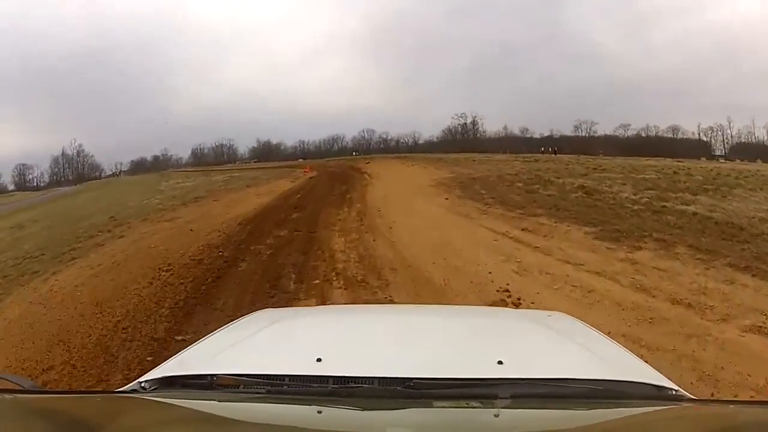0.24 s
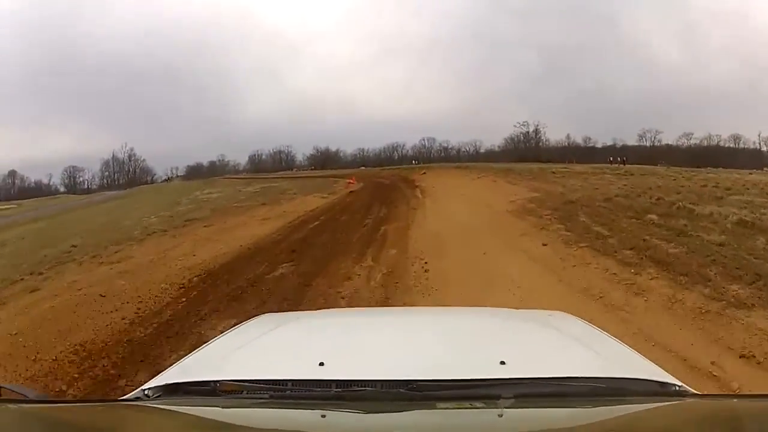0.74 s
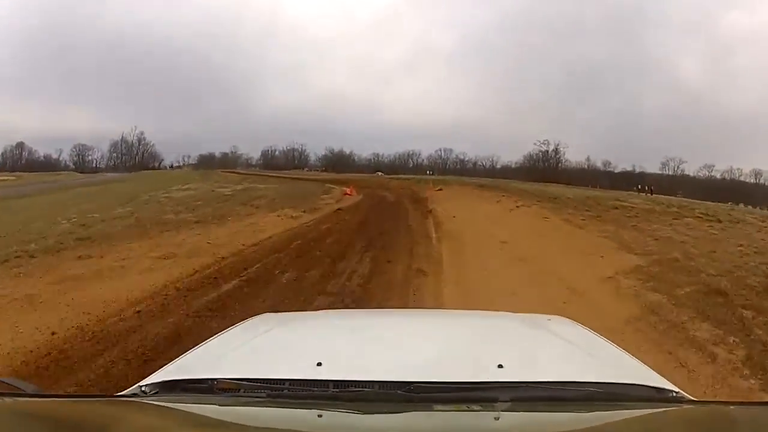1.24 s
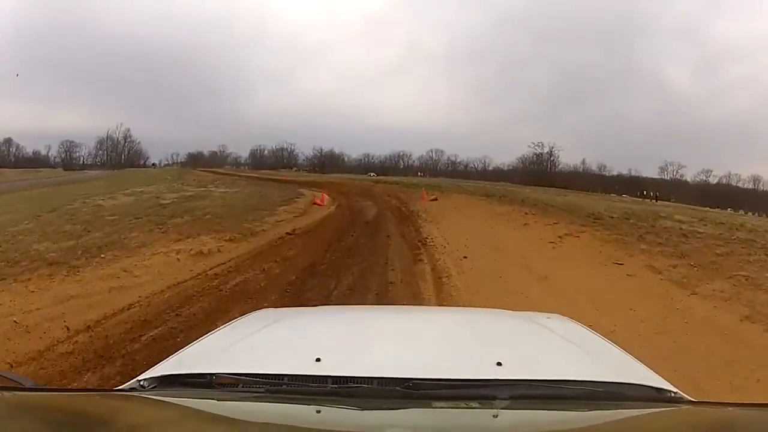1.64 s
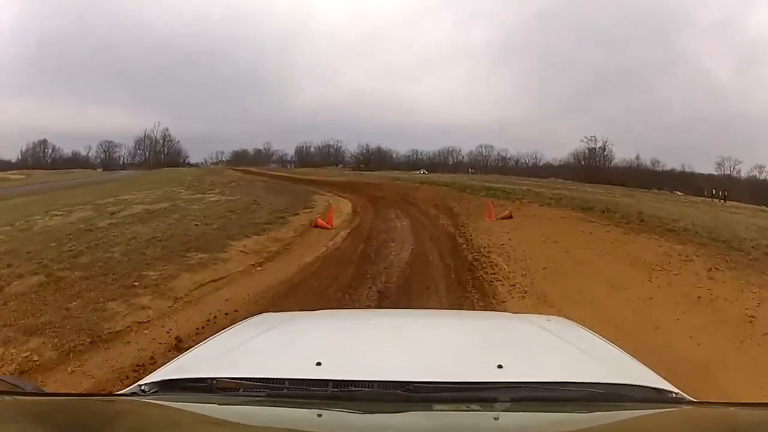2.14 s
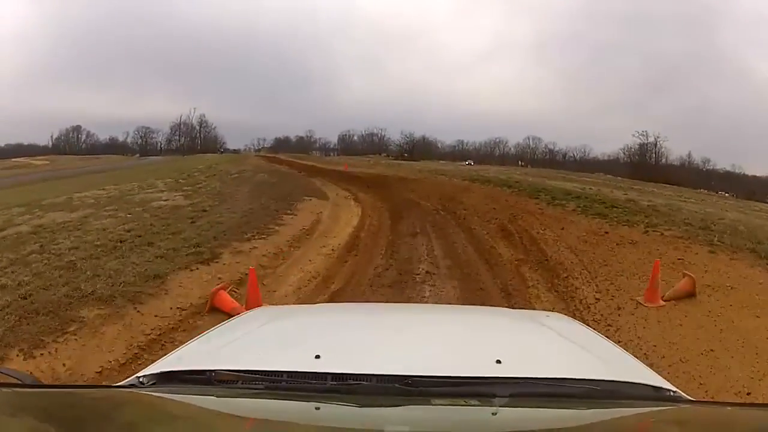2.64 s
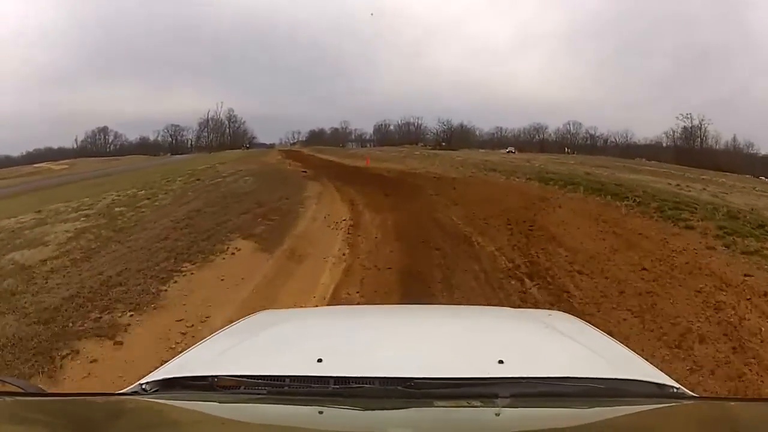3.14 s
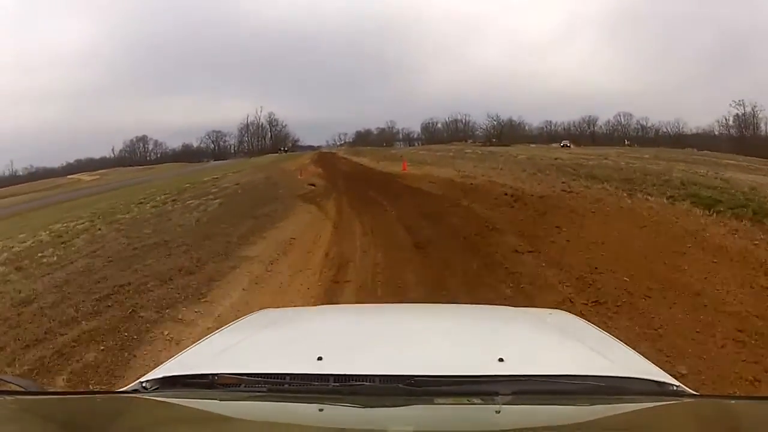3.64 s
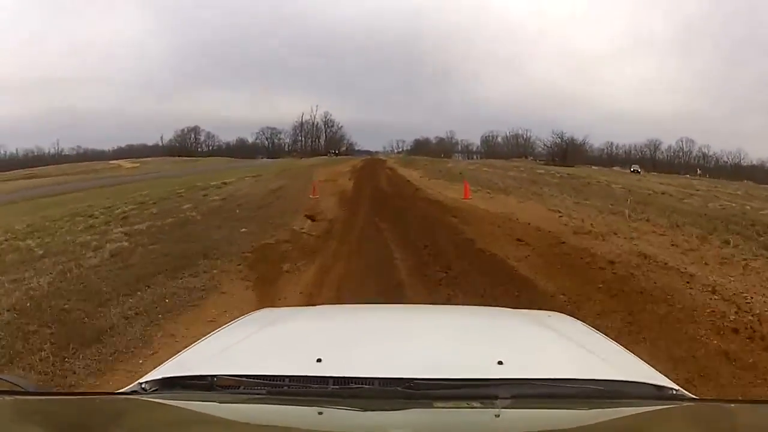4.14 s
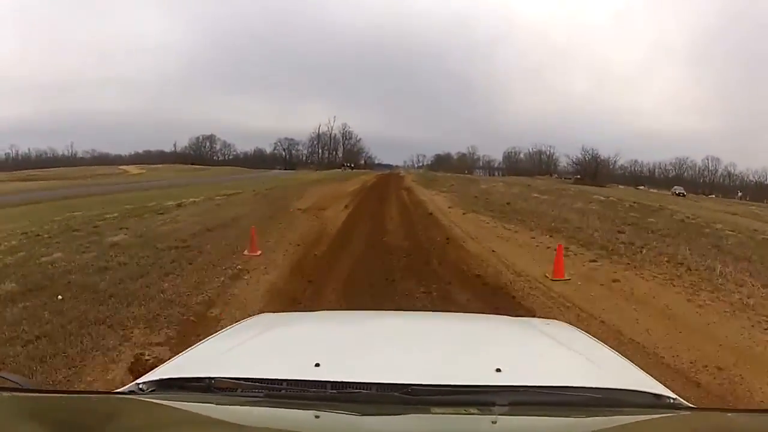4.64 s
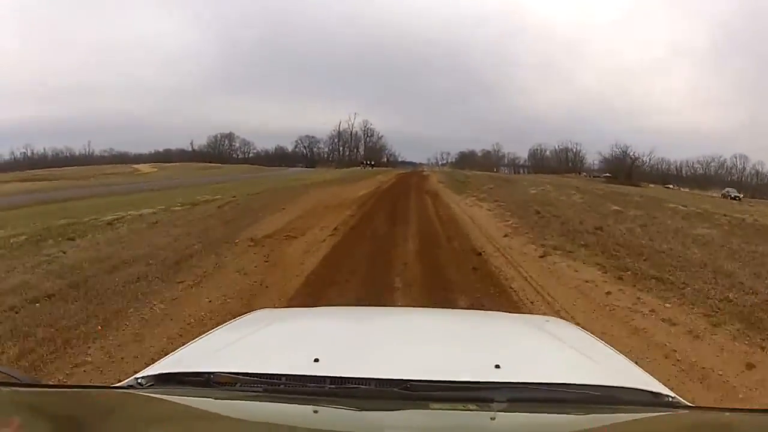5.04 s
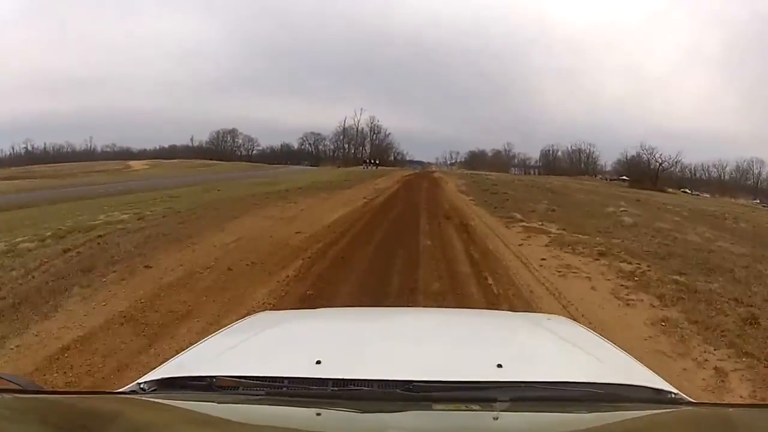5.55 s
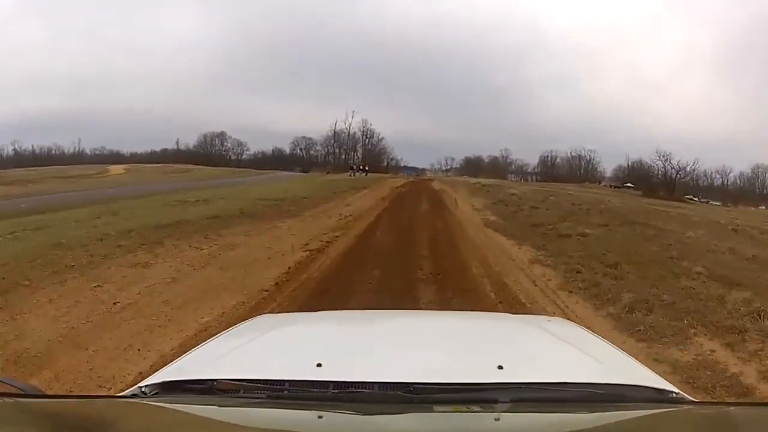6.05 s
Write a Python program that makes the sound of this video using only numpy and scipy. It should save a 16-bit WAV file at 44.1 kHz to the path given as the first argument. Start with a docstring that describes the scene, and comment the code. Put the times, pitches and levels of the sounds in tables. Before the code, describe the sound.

A microphone behind the windscreen catches muffled, bass-heavy cabin boom as a car runs a loose dirt bend. The engine sinks, swells loudly, drops out briefly, swells again, then rises in pitch down the straight. Pebbles tick and stones rattle on the floor pan in two main bursts, small squeaks slip between, bumps thump, and a dry rushing spray of grit thickens until the end.

```python
"""Rally car on dirt, heard in the cabin

A four-cylinder rally car is driven hard round a dirt bend and onto a straight; one microphone stands inside,
behind the windscreen. Exhaust orders and rut-shaken noise make the cabin boom, and each bump swells it.
Under the floor, random grains hiss in the wheel arches, loudest at the end; pebbles and stones ring the floor pan.
Filtered noise makes the shake, the drumming and the tyre roar; bent tones squeak, and an overload knocks once."""
import sys
import numpy as np
from scipy import signal
from scipy.fft import rfft, irfft
from scipy.io import wavfile
from scipy.ndimage import uniform_filter1d

SR = 44100
rng = np.random.default_rng(int(sys.argv[2]) if len(sys.argv) > 2 else 0)


def transcribe(signal):
    """Save signal, clipped to [-1, 1], as a 16-bit WAV file at the path in sys.argv[1]."""
    frames = np.atleast_2d(signal).T
    limited = np.clip(frames, -1, 1)
    pcm = np.round(limited * 32767).astype(np.int16)
    wavfile.write(sys.argv[1], SR, pcm)


N = 277830

# Resonances of the floor pan: (frequency [Hz], width [Hz], relative level [dB])
FLOOR_PAN_MODES = [(1794, 104, 8), (2215, 125, 5.5), (3250, 315, -1.5), (3576, 134, 5.5), (5127, 250, -4.5),
                   (6850, 240, -5.5), (8350, 300, -2.5), (10080, 610, -5)]
# Stones at set times, heavy and light: (time [s], dull ring level [dB],
# brightness = middle ring over dull ring [dB])
TIMED_STONES = [(.07, -36, -31), (0.294, -41, -23), (.456, -39, 6.5), (0.516, -45.5, -3), (.555, -41.5, -1),
                (.582, -40.5, 3.5), (.618, -46, 1), (.6452, -30, 0.5), (.649, -35, 2.5), (.686, -48, 1),
                (.704, -46.5, -1), (.7708, -34.5, -7), (.844, -38, -15), (3.7803, -32.5, -13),
                (3.847, -36, -8), (3.912, -37, -0.5), (3.9267, -38, -2), (3.9957, -36, -7),
                (4.0275, -28, 0.5), (4.115, -34, -25), (4.1662, -28, -2.5), (4.1833, -33, -19),
                (4.2504, -32, -8), (4.3194, -34.5, -8), (4.4094, -30.5, -9), (4.4599, -31, -19),
                (4.5101, -38.5, -3), (4.5985, -32.5, -22)]
# Stony stretches of track: (start [s], end [s], extra pebble level [dB], small stones [per s],
# their dull ring level [dB], their brightness [dB])
STONY_STRETCHES = [(0.476, 0.737, 10, 16, -50, -4), (2.0, 2.397, 4, 45, -41, -23),
                   (3.9, 4.652, 4.5, 16, -45, -1)]


def from_db(db):
    """Decibels to gain."""
    return 10 ** (np.asarray(db) / 20)


def rms_one(x):
    """Scale to unit power."""
    return x / np.sqrt(np.mean(x ** 2) + 1e-20)


def in_time(rows):
    """Each column of a curve table at every sample."""
    s, *columns = np.transpose(rows)
    return [np.interp(np.arange(N) / SR, s, column) for column in columns]


def colour(x, points):
    """Shape a steady sound with a spectrum, drawn straight over log frequency, at unit power."""
    hz, db = np.transpose(points)
    grid = np.maximum(np.fft.rfftfreq(N, 1 / SR), 1)
    gain = from_db(np.interp(np.log(grid), np.log(hz), db))
    return rms_one(irfft(rfft(x) * gain, N))


def noise():
    """White noise."""
    return rng.standard_normal(N)


def drift(rate):
    """Slow chance with about this many turns a second; spread 1."""
    lowpass = 1 / (1 + (np.fft.rfftfreq(N, 1 / SR) / rate) ** 2)
    return rms_one(irfft(rfft(noise()) * lowpass, N))


def even(x, seconds):
    """Keep the quick flutter of a sound but hold its slower level at 1."""
    size = max(int(seconds * SR), 2)
    power = uniform_filter1d(uniform_filter1d(x * x, size), size)
    return x / np.sqrt(power + 1e-12)


def resonate(x, hz, width_hz):
    """A two-pole resonance with gain 1 on top."""
    r = np.exp(-np.pi * width_hz / SR)
    b = np.array([1, 0, -1]) * (1 - r * r) / 2
    a = [1, -2 * r * np.cos(2 * np.pi * hz / SR), r * r]
    return signal.lfilter(b, a, x + 1e-18)


def engine(firing_hz, wobble=0.0031):
    """Exhaust orders, each a little unsteady; they swell and fade as they sweep across the cabin's resonances."""
    # Exhaust orders: (multiple of the firing rate, relative level [dB])
    exhaust_orders = [(0.501, -33), (0.748, -9.5), (1, 2.5), (1.25, -13), (1.5, -9), (2.001, -16),
                      (2.502, -35), (3, -26.5)]
    # How the cabin passes the exhaust: (frequency [Hz], gain [dB])
    cabin_gain = [(45, -8), (62, -2), (75, -6), (100, 0), (142, 0), (160, -18), (180, -15), (192, 2),
                  (203, 3), (216, -12), (240, -18), (305, -22), (352, -12), (430, -15)]
    turns = np.cumsum(firing_hz * (1 + wobble * drift(17.4))) / SR
    cabin_hz, cabin_db = np.transpose(cabin_gain)
    out = 0
    for multiple, db in exhaust_orders:
        gain = from_db(db + np.interp(multiple * firing_hz, cabin_hz, cabin_db))
        unsteady = 1 + .11 * drift(12)
        start = rng.random()
        out = out + gain * unsteady * np.sin(2 * np.pi * (multiple * turns + start))
    return rms_one(out)


def cabin_rumble():
    """Ruts shake the cabin's lowest resonances: noise through cascaded pairs of resonances, held level."""
    # Cabin air and panel resonances: (frequency [Hz], half the width of each resonance in a pair [Hz],
    # relative level [dB])
    cabin_modes = [(86.9, 3.9, 2.5), (106.06, 11.9, 12.5), (124, 17.4, -1)]
    out = 0
    for hz, width, db in cabin_modes:
        once = resonate(noise(), hz, 2 * width)
        out = out + from_db(db) * rms_one(resonate(once, hz, 2 * width))
    return even(out, seconds=0.074)


def bump_swells(rise_s=0.011, fall_s=0.015):
    """At each bump the cabin air takes a moment to build up, and a little longer to die away: gain."""
    # Bumps that make the cabin boom: (time of the crest [s], level [dB])
    bumps = [(.35, -11.5), (.75, -13), (1.09, -11), (1.42, -14.5), (1.72, -8.5), (1.86, -11.5), (2.48, -16),
             (2.61, -9), (2.88, -10), (3.26, -11), (3.38, -12.5), (3.56, -11), (3.64, -15), (3.8, -12),
             (3.9, -11), (4.0, -11.5), (4.09, -13), (4.17, -11.5), (4.44, -16), (4.51, -6.5), (4.569, -6.5),
             (4.63, -7.5), (4.721, -10), (4.81, -9.5), (5.03, -7.5), (5.5, -7.5), (5.77, -7.5)]
    t = np.arange(N) / SR
    power = 0
    for s, db in bumps:
        spread_s = np.where(t < s, rise_s, fall_s)
        swell = from_db(db) * np.exp(-((t - s) / spread_s) ** 2 / 2)
        power = power + swell ** 2
    return np.sqrt(power)


def boom(firing_hz, drone_db, shake_db, flutter_db=2.0):
    """Exhaust and ruts drive the same cabin air: rougher ground raises the rumble, and each bump swells it."""
    # rumble level on average ground, and the share of the shake's swing that it follows
    rumble_db, rumble_follows = -19.0, 0.79
    rutted_db = shake_db - np.mean(shake_db)
    steady_rumble = from_db(rumble_db + rumble_follows * rutted_db + flutter_db * drift(25))
    rumble = np.hypot(steady_rumble, bump_swells())
    drone = from_db(drone_db)
    level = np.hypot(drone, rumble)
    deep = signal.sosfilt(signal.butter(2, 200, fs=SR, output="sos"), cabin_rumble())
    mix = drone * engine(firing_hz) + rumble * deep
    return level * even(mix / level, seconds=0.08)


def grit(spray_db, grains_per_s=5000, spread_db=2.5, smooth=0.48, flutter_db=1.11, ring_db=-15, brighten=0.4):
    """Grains pelt the wheel arches; a harder spray is thicker and rings the upper modes of the floor pan more."""
    # Spectrum of the spray: (frequency [Hz], relative density [dB per Hz])
    spray_spectrum = [(600, -33), (1000, -12.5), (1200, 7), (1500, 3.5), (1800, 6.5), (2050, 1.5),
                      (2350, 3.5), (2800, -6.5), (3100, -3), (3300, -8.5), (3580, 1.5), (4000, -17),
                      (5000, -23), (16000, -71)]
    force_db = spray_db - np.mean(spray_db)
    born = rng.random(N) < grains_per_s * from_db(force_db) / SR
    sizes = from_db(spread_db * np.minimum(rng.exponential(1, N), 5))
    grains = born * sizes * rng.choice([-1, 1], N)
    pelting = even(grains, seconds=0.69) + smooth * noise()
    ringing = 0
    for k, (hz, width, db) in enumerate(FLOOR_PAN_MODES):
        if hz > SR / 10:
            ringing = ringing + (-1) ** k * from_db(db) * resonate(pelting, hz, width)
    hiss = colour(pelting, spray_spectrum)
    hiss = hiss + from_db(ring_db + brighten * force_db) * rms_one(ringing)
    return from_db(spray_db + flutter_db * drift(20)) * hiss


def stone_hits(count=24, spread_db=3.2):
    """The timed stones, and small ones thrown up at random on the stony stretches: rows of (s, dB, brightness dB)."""
    hits = list(TIMED_STONES)
    for start, end, _, per_s, db, bright_db in STONY_STRETCHES:
        times = start + rng.random(count) * (end - start)
        # small stones differ in weight and brightness
        spreads = spread_db * rng.standard_normal((count, 2))
        small = [(s, db + heavier, bright_db + brighter) for s, (heavier, brighter) in zip(times, spreads)]
        hits += small[:max(round(per_s * (end - start)), 0)]
    return hits


def stones(contact_s=0.0025, scuff_db=-13, crack_noise_db=-12, scatter=0.037):
    """A stone taps the floor pan and scuffs along it; chance detunes the modes, weight and brightness set levels."""
    # sharp crack against the dull ring; share of the brightness that it follows;
    # dB of crack lost for each dB that a stone is lighter than the heaviest timed one
    crack_db, crack_follows, crack_grows = -7, 0.59, 0.13
    heaviest_db = max(db for _, db, _ in TIMED_STONES)
    age = np.arange(SR // 25) / SR
    bright = signal.butter(2, [4000, 8500], "band", fs=SR, output="sos")
    out = np.zeros(N)
    for s, dull_db, bright_db in stone_hits():
        sharp_db = dull_db + crack_db + crack_follows * bright_db - crack_grows * (heaviest_db - dull_db)
        ring_db = [dull_db, dull_db + bright_db, sharp_db]
        scuff = rng.standard_normal(len(age)) * np.exp(-age / contact_s)
        detune = 1 + scatter * (2 * rng.random(len(FLOOR_PAN_MODES)) - 1)
        # light stones only tap, heavy ones drag
        force = (age == 0) + from_db(scuff_db + max(ring_db) - heaviest_db) * scuff
        # three rows: dull ring, middle ring, sharp crack; split at 2700 and 4400 Hz
        rings = np.zeros((3, len(age)))
        rings[-1] = from_db(crack_noise_db) * signal.sosfilt(bright, force)
        for k, ((hz, width, db), shift) in enumerate(zip(FLOOR_PAN_MODES, detune)):
            row = np.searchsorted([2700, 4400], hz)
            rings[row] += (-1) ** k * from_db(db) * resonate(force, hz * shift, width)
        # levels hold for the first hundredth of a second
        rings /= np.sqrt(np.mean(rings[:, :SR // 100] ** 2, axis=1, keepdims=True))
        at = int(s * SR)
        out[at:at + len(age)] += from_db(ring_db) @ rings
    return out


def pebbles(spray_db, per_s=130, size_db=28.5, spread_db=3):
    """Between the grit and the stones, small pebbles tick on single modes of the floor pan."""
    t = np.arange(N) / SR
    stony_db = sum(db * ((t > start) & (t < end)) for start, end, db, *_ in STONY_STRETCHES)
    out = np.zeros(N)
    lowest_hz = FLOOR_PAN_MODES[0][0]
    for hz, width, db in FLOOR_PAN_MODES:
        born = rng.random(N) < per_s / len(FLOOR_PAN_MODES) / SR
        taps = born * from_db(spread_db * np.minimum(rng.exponential(1, N), 3))
        # dirt cushions the contact, so the high modes get less
        cushion = (lowest_hz / hz) ** 0.95
        out += from_db(db) * cushion * resonate(taps, hz, width)
    return from_db(spray_db + size_db + stony_db) * out


def overload_knock():
    """The loudest boom overloads the recorder: one short, soft low-mid knock."""
    # Knock: (time [s], strength before softening [dB])
    knock_rows = [(4.504, -14)]
    # Overload knock: (frequency [Hz], width [Hz], relative level [dB])
    knock_bands = [(290, 130, 0), (460, 150, -6)]
    knocks = np.zeros(N)
    for s, db in knock_rows:
        knocks[int(s * SR)] = from_db(db)
    soft = signal.sosfilt(signal.butter(4, 620, fs=SR, output="sos"), knocks + 1e-18)
    out = 0
    for hz, width, db in knock_bands:
        # scaled so that a unit knock, unsoftened, starts a 0 dB band at about height 1
        scale = SR / (2 * np.pi * width)
        out = out + from_db(db) * scale * resonate(soft, hz, width)
    return out


def squeaks(rough=0.022):
    """Rubber sticks and slips: a short, nearly pure tone that bends in pitch."""
    # Squeaks: (time [s], length [s], start pitch [Hz], middle pitch [Hz], end pitch [Hz], level at the middle [dB])
    squeak_rows = [(0.036, 0.062, 501, 491, 460, -42.5), (0.448, 0.067, 635, 594, 543, -44.5),
                   (2.036, 0.27, 475, 549, 496, -42), (2.639, 0.088, 774, 723, 720, -39),
                   (2.712, 0.047, 672, 620, 589.4, -34.5)]
    out = np.zeros(N)
    waver = 1 + rough * drift(77)
    for s, length, *pitch_hz, db in squeak_rows:
        along = np.clip((np.arange(N) / SR - s) / length, 0, 1)
        bend = np.polyfit([0, .5, 1], pitch_hz, 2)
        hz = np.polyval(bend, along) * waver
        tone = np.sin(2 * np.pi * np.cumsum(hz) / SR)
        out += from_db(db) * np.sqrt(2) * np.sin(np.pi * along) * tone
    return out


def chassis_shake(shake_db):
    """Rutted ground shakes the chassis: deep noise, held even and then set to the ground's level."""
    # Spectrum of the shake: (frequency [Hz], relative density [dB per Hz])
    shake_spectrum = [(12, -20), (22, -9), (30, -4), (40, -13), (52, -6), (62, 1), (74, -3), (95, -25),
                      (200, -60)]
    return from_db(shake_db) * even(colour(noise(), shake_spectrum), seconds=0.1)


def upper_drumming():
    """The cabin drums above its boom: narrow low noise, held even and then set to a moving level."""
    # Spectrum of the drumming: (frequency [Hz], relative density [dB per Hz])
    drumming_spectrum = [(110, -5), (150, -23.5), (172, -1), (195, 2), (215, -11), (240, -19), (300, -73),
                         (600, -101)]
    # Drumming: (time [s], level [dB])
    level_curve = [(0, -29), (1.3, -31.5), (1.65, -28), (2.05, -37), (2.5, -23), (2.9, -31.5), (3.5, -29),
                   (4.1, -24.5), (4.7, -32), (5.6, -27), (6.3, -29.5)]
    drumming_db, = in_time(level_curve)
    return from_db(drumming_db) * even(colour(noise(), drumming_spectrum), seconds=0.21)


def tyre_roar(trim_db=1.5):
    """Tyres roar on the dirt: mid-band noise that follows a moving level."""
    # Spectrum of the roar: (frequency [Hz], relative density [dB per Hz])
    roar_spectrum = [(150, 5), (250, -31), (285, 2), (330, 5.5), (420, -1.5), (540, -3), (620, 5), (700, 4),
                     (800, -5.5), (1000, -1.5), (1300, -6), (3000, -85)]
    # Tyre roar: (time [s], level before the trim [dB])
    level_curve = [(0.0, -50.5), (0.65, -43.5), (0.98, -49), (1.84, -46), (2.32, -41), (2.91, -47),
                   (3.77, -48.5), (4.33, -40.5), (4.68, -42), (6.3, -37)]
    roar_db = in_time(level_curve)[0] + trim_db
    return from_db(roar_db) * colour(noise(), roar_spectrum)


def scene():
    """Drone, body noise and flying dirt meet at one microphone behind the windscreen."""
    # Engine: (time [s], firing rate [Hz], drone level [dB])
    engine_curve = [(0, 109.2, -29), (.78, 108, -24.5), (1.1, 95.9, -26.5), (1.55, 94.95, -26),
                    (1.86, 104, -12), (2.05, 110.4, -7), (2.3, 121.2, -8.5), (2.42, 124, -38),
                    (2.66, 114, -19), (2.8, 106, -9.5), (3.02, 102.8, -26), (4.4, 113.1, -18),
                    (4.7, 118, -15.5), (5.3, 125.5, -16), (5.55, 128.5, -13.5), (5.85, 134, -12.5),
                    (6.3, 143.3, -18.5)]
    # How rutted the ground is: (time [s], chassis shake level [dB])
    ground_curve = [(0, -30), (.3, -34.5), (.7, -23), (1.1, -31), (1.4, -29.5), (1.8, -29), (2.15, -27),
                    (2.45, -25), (2.7, -39), (3.1, -27), (3.3, -29.5), (3.7, -30.5), (4.0, -24.5),
                    (4.5, -22), (4.8, -26.5), (5.5, -28), (6.3, -24)]
    # Grit spray: (time [s], level before the trim [dB])
    spray_curve = [(0.0, -43), (0.37, -47), (0.67, -44.5), (0.93, -44.5), (1.84, -40.5), (2.21, -37),
                   (2.9, -35.5), (3.39, -37.5), (4.38, -38.5), (5.3, -33.5), (5.67, -30), (6.3, -28.5)]
    firing_hz, drone_db = in_time(engine_curve)
    shake_db, = in_time(ground_curve)
    spray_db = in_time(spray_curve)[0] - 0.82  # trim [dB]
    cabin = boom(firing_hz, drone_db, shake_db) + overload_knock()
    dirt = grit(spray_db) + stones() + pebbles(spray_db)
    body = squeaks() + chassis_shake(shake_db) + upper_drumming()
    return (cabin + dirt + body + tyre_roar())[None]


def record(dry):
    """Crude sample-rate conversion mirrors the sound faintly into the treble; the top is rounded off, then cut."""
    # Periodic timing error of the conversion: (frequency [Hz], timing error [microseconds])
    conversion_error = [(3900, 5), (4200, 3), (7800, 2.6), (8100, 7), (12000, 22), (15600, 1.3)]
    t = np.arange(N) / SR
    timing_error_s = sum(us * 1e-6 * np.sin(2 * np.pi * hz * t) for hz, us in conversion_error)
    # a small shift in time adds the slope times the shift
    converted = dry + timing_error_s * SR * np.gradient(dry, axis=-1)
    rounded = signal.sosfilt(signal.butter(8, 14900, fs=SR, output="sos"), converted)
    return signal.sosfilt(signal.ellip(14, .1, 90, 15750, fs=SR, output="sos"), rounded)


dry = scene()
out = record(dry)
transcribe(out)
```